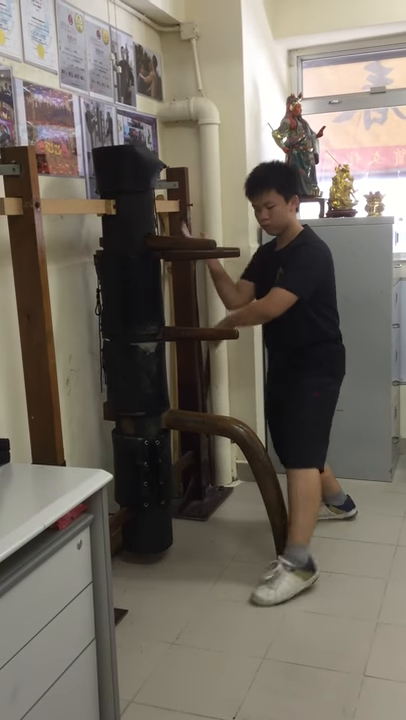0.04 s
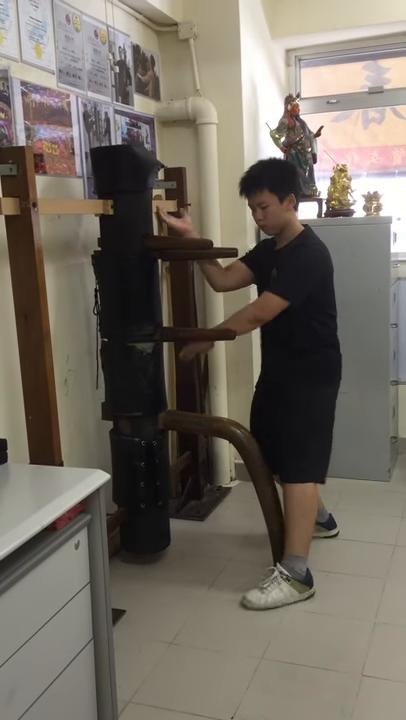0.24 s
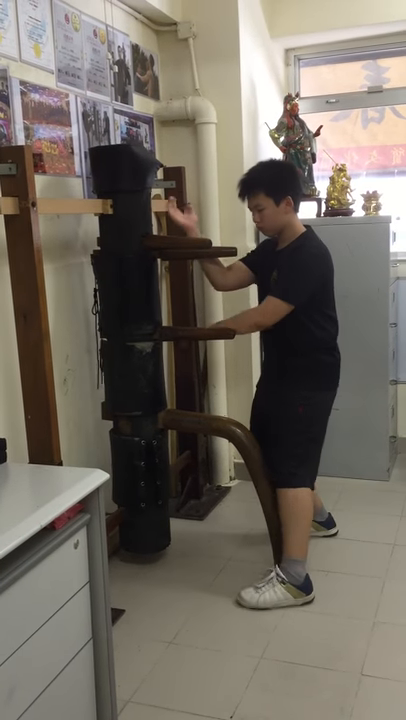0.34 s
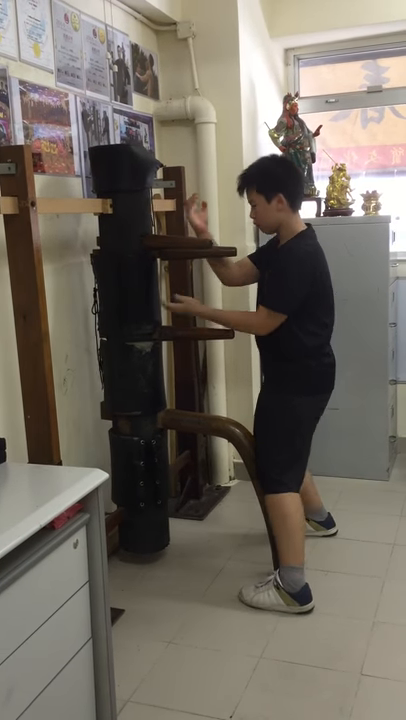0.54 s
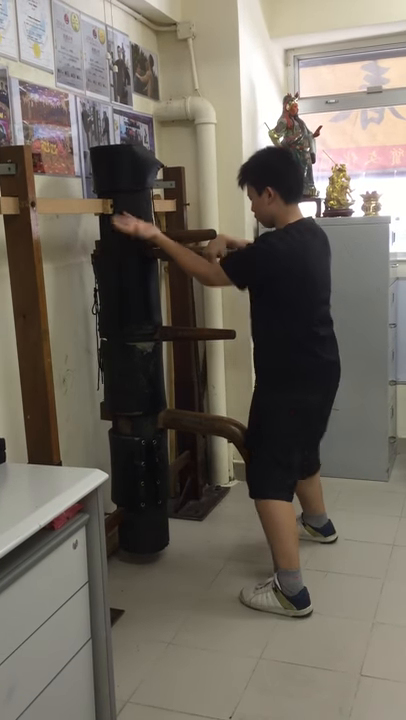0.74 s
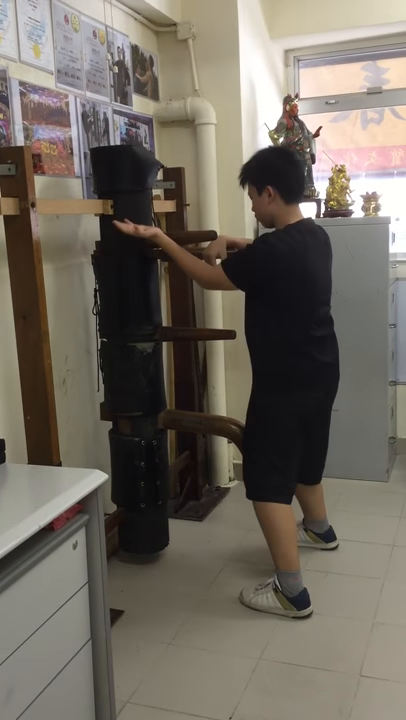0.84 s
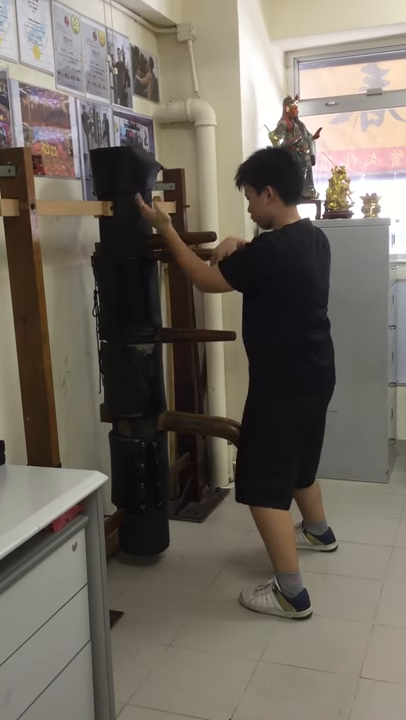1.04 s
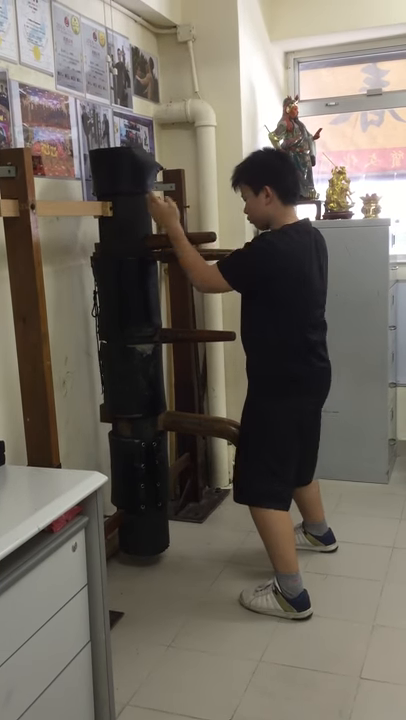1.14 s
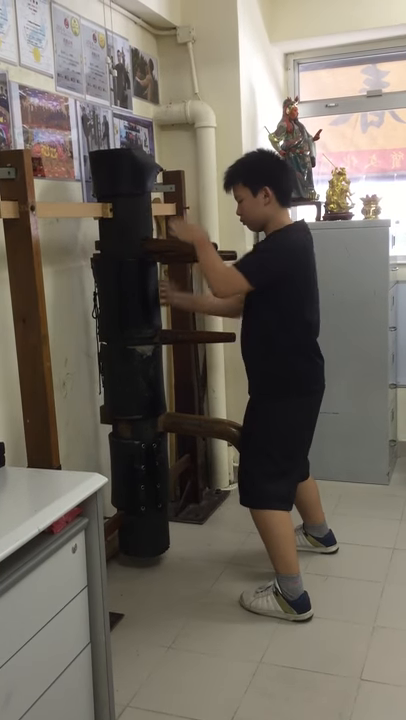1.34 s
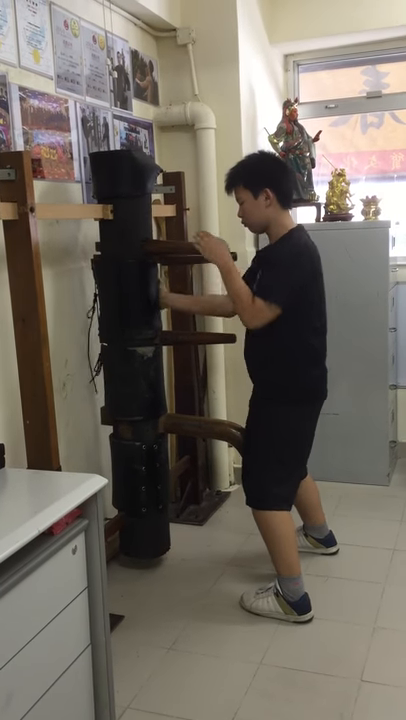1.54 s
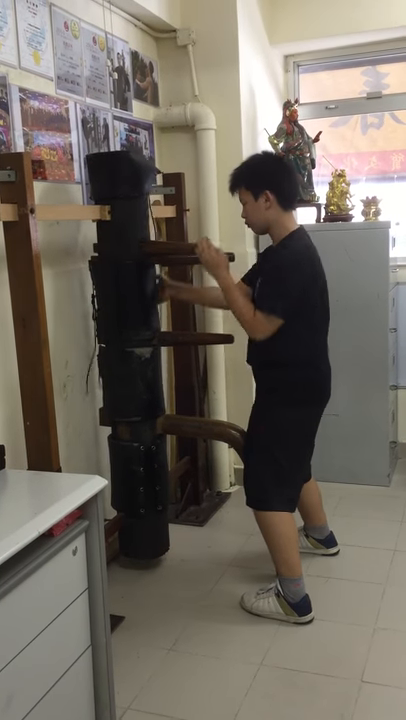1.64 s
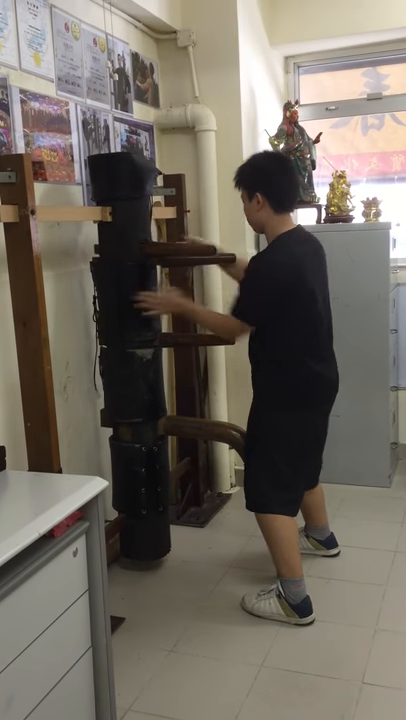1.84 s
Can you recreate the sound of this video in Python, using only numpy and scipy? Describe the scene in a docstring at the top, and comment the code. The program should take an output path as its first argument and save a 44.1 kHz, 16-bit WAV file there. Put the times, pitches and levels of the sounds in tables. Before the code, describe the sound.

Forearms knock on a wooden training dummy, clacking and thudding in an echoing room.

```python
"""A small, hard, tiled room, with one microphone facing a wooden training dummy from far enough off
that the room outweighs the direct sound. Forearms hit each of two loose wooden arms, which clack and
rattle in their sockets; then two palms land on the trunk. The heavy trunk thuds and booms on its rails,
and the room rings for about a second after every blow. Clothes rustle over a quiet room tone."""
import sys
import numpy as np
from scipy import signal
from scipy.fft import rfft, irfft, next_fast_len
from scipy.io import wavfile
from scipy.ndimage import uniform_filter1d

SR = 44100
rng = np.random.default_rng(int(sys.argv[2]) if len(sys.argv) > 2 else 0)


def bounce(signal):
    """Save signal as a 16-bit WAV file at the path given by the first command-line argument."""
    frames = np.transpose(np.atleast_2d(signal))
    limited = np.clip(frames, -1, 1)
    pcm = np.round(limited * 32767).astype(np.int16)
    wavfile.write(sys.argv[1], SR, pcm)


N = 83790
TIME = np.arange(N) / SR

# contacts of each wooden arm: t/s, level/dB, brightness f/Hz, clack relative to the contact/dB
FIRST_ARM_KNOCKS = [(.2225, 21, 3630, 5), (.2445, 27.5, 6870, 3.5), (.2545, 15.5, 3230, -8),
                    (.274, 9, 2470, 9)]
SECOND_ARM_KNOCKS = [(.8348, 17, 1970, 8.5), (.8425, 24, 9000, 0), (.877, -0.5, 14500, 8),
                     (.8915, 8.5, 1900, 19.5)]


def from_db(db):
    """Decibels to gain."""
    return 10 ** (np.asarray(db) / 20)


def at_hz(points, hz):
    """Read a table on a log-frequency axis."""
    freqs, values = np.transpose(points)
    return np.interp(np.log(np.maximum(hz, 1)), np.log(freqs), values)


def unit(x):
    """Scale to an energy of one."""
    return x / np.sqrt(np.sum(x ** 2) + 1e-20)


def dying(t60):
    """Envelope that falls by 60 dB in t60 seconds."""
    return np.exp(-np.log(1000) * TIME / t60)


def rising(rise_s):
    """Envelope that climbs towards one with time constant rise_s."""
    return 1 - np.exp(-TIME / rise_s)


def delayed(x, s):
    """Start x at time s."""
    return np.concatenate([np.zeros(max(int(s * SR), 0)), x])[:N]


def coloured(x, spectrum):
    """Causal (minimum-phase) filter with the given spectrum."""
    size = 2 * next_fast_len(N)
    gain = from_db(at_hz(spectrum, np.fft.rfftfreq(size, 1 / SR)))
    cepstrum = irfft(np.log(gain))
    cepstrum[1:size // 2] *= 2
    cepstrum[size // 2 + 1:] = 0
    return irfft(rfft(x, size) * np.exp(rfft(cepstrum)))[:N]


def evened(x, width_hz):
    """Level the spectrum of a burst, keeping only ripple finer than width_hz."""
    spectrum = rfft(x)
    power = uniform_filter1d(np.abs(spectrum) ** 2, max(int(width_hz * N / SR), 1))
    flat = irfft(spectrum / np.sqrt(np.abs(power) + 1e-12), N)
    return unit(flat * (TIME < TIME[-1] / 2))


def contact(s, db, bright_hz, smear_s=0):
    """A click, or a short swelling burst where surfaces rattle or flesh spreads; softer is duller."""
    push = signal.unit_impulse(N)
    if smear_s:
        swell = TIME * np.exp(-2 * TIME / smear_s)
        push = evened(rng.standard_normal(N) * swell, width_hz=8.6) * np.sqrt(swell)
    soft = signal.butter(2, min(bright_hz, .45 * SR), fs=SR, output="sos")
    return from_db(db) * signal.sosfilt(soft, delayed(unit(push), s) + 1e-18)


def resonance(x, hz, width_hz):
    """One mode, gain 1 at its top."""
    r = np.exp(-np.pi * width_hz / SR)
    feedback = [1, -2 * r * np.cos(2 * np.pi * hz / SR), r * r]
    return signal.lfilter(np.array([1, 0, -1]) * (1 - r * r) / 2, feedback, x + 1e-18)


def low_swing(s, db, hz, t60, rise_s):
    """One deep mode that swells and dies after a push."""
    swing = -np.sin(2 * np.pi * hz * TIME) * dying(t60) * rising(rise_s)
    return from_db(db) * delayed(swing, s)


def room_tone():
    """The steady, low hush of the room."""
    spectrum = [(25, -8), (55, -16), (98, 7.5), (135, -2.5), (280, -5.5), (450, -14), (1100, -13),
                (2200, -20), (4000, -34), (9000, -41.5), (16000, -53)]  # colour of the hush: f/Hz, level/dB
    return from_db(-22) * coloured(rng.standard_normal(N), spectrum)


def clothes():
    """The treble hiss of cloth, swelling as the body moves."""
    rustle = [(0, -56.5), (.13, -48.5), (.2, -48.5), (.4, -41), (.7, -76), (.82, -48.5), (1.1, -72),
              (1.4, -79), (1.7, -57), (1.9, -61)]  # course of the hiss: t/s, level/dB
    spectrum = [(500, -39), (2500, 3.5), (5000, 0), (9300, -1), (10500, -13.5), (13000, -8), (17000, -41)]  # colour of the cloth: f/Hz, level/dB
    motion = from_db(np.interp(TIME, *np.transpose(rustle)))
    return motion * coloured(rng.standard_normal(N), spectrum)


def tiled_room(x):
    """At the microphone: weak direct sound, near-wall reflections and a tail whose treble dies first."""
    decay = [(60, 1.7), (150, 1.64), (300, 1.035), (700, 0.9), (1600, 0.99), (3000, 0.96), (6000, 0.72),
             (10000, 0.59), (16000, 0.27)]  # reverberation time: f/Hz, T60/s
    direct_db, early_db, walls_db = -10, 6.5, 0.26
    hz, centres = np.fft.rfftfreq(N, 1 / SR), np.geomspace(50, 16000, 14)
    white = rfft(rng.standard_normal(N))
    bands = [irfft(white * at_hz(np.c_[centres, share], hz), N) for share in np.eye(len(centres))]
    tail = sum(band * dying(at_hz(decay, centre)) for band, centre in zip(bands, centres))
    tail = unit(tail * rising(0.0043))
    echoes = rng.standard_normal(N) * (rng.random(N) < 3000 / SR)  # about 3000 a second
    early = from_db(early_db) * unit(echoes * dying(0.3))
    diffuse = evened(early + tail, width_hz=25.6)  # the walls favour no wider band
    walls = from_db(walls_db) * delayed(diffuse, 0.001895)
    return from_db(direct_db) * x + signal.fftconvolve(x, walls)[:N]


def lingering_tones():
    """The purest tones of each arm build up in the room after its hardest contact and die with it."""
    # tones that the room keeps ringing: f/Hz, level/dB
    first_tones = [(1735, -32), (1772, -22.5)]
    second_tones = [(1007, -21), (1372, -56), (1533, -16), (1587, -22)]
    ringing = np.zeros(N)
    for knocks, tones in (FIRST_ARM_KNOCKS, first_tones), (SECOND_ARM_KNOCKS, second_tones):
        hardest_s = max(knocks, key=lambda knock: knock[1])[0]
        sines = sum(from_db(db) * np.sin(2 * np.pi * (hz * TIME + rng.random())) for hz, db in tones)
        ringing += delayed(sines * dying(0.76) * rising(0.017), hardest_s)
    return ringing


def frame_boom():
    """The frame swings in one deep, slowly dying mode."""
    pushes = [(0.291, -60), (1.598, -33)]  # pushes on the frame: t/s, level/dB
    return sum(low_swing(s, db, hz=55.3, t60=6.8, rise_s=0.043) for s, db in pushes)


def bumps():
    """Soft, deep bumps that die at once."""
    pulses = [(0.296, -19, 76.5, 0.1), (1.4875, -18.5, 63, 0.091), (1.880, -2, 81, 0.015)]  # bass pulses: t/s, level/dB, f/Hz, T60/s
    return sum(low_swing(s, db, hz, t60, rise_s=0.00062) for s, db, hz, t60 in pulses)


def trunk():
    """Dull thuds of the trunk on its rails."""
    landings = [(0.263, 17.5, 497), (0.29, 32, 240), (0.887, 21, 497)]  # trunk meets rails: t/s, level/dB, brightness f/Hz
    spectrum = [(25, -46), (50, 6.5), (80, -12), (125, 1.5), (200, -1.5), (300, 1), (600, -10.5),
                (2000, 18)]  # response of the trunk: f/Hz, level/dB
    return coloured(sum(contact(s, db, hz) for s, db, hz in landings), spectrum)


def rattles():
    """A loose arm chatters in its socket, wood on wood, fine and bright."""
    bursts = [(0.246, 3, 0.065), (0.835, 11.5, 0.037), (1.504, 4, 0.0087)]  # bursts of chatter: t/s, level/dB, smear/s
    spectrum = [(500, -23), (2500, -43), (4000, -22.5), (7000, -3), (10000, -9), (17000, -16.5)]  # colour of the chatter: f/Hz, level/dB
    chatter = sum(contact(s, db, bright_hz=15700, smear_s=smear) for s, db, smear in bursts)
    return coloured(chatter, spectrum)


def hands():
    """Palms slap the trunk and skin brushes along the wood."""
    palms = [(1.4735, 14.5, 15400), (1.513, 12.5, 1490), (1.5234, 19, 4330), (1.536, 14.5, 11300),
             (1.583, 13.5, 2980), (1.631, 12.5, 1290), (1.662, 2.5, 14900)]  # palm contacts: t/s, level/dB, brightness f/Hz
    palm_spectrum = [(60, 5), (150, 3), (330, 9), (450, 3), (680, 8.5), (900, 5), (1100, 7), (1500, 4.5),
                     (2200, -0.5), (3500, -7), (5500, -13.5), (10000, -19), (17000, -25)]  # colour of a slap: f/Hz, level/dB
    strokes = [(1.43, 10.5)]  # sliding skin: t/s, level/dB
    brush_spectrum = [(300, -1.5), (1500, -10), (2600, -5), (4500, -10), (6500, -21), (8000, -35),
                      (16000, -46)]  # colour of a stroke: f/Hz, level/dB
    slaps = sum(contact(s, db, hz, smear_s=0.005) for s, db, hz in palms)
    brushes = sum(contact(s, db, bright_hz=11900, smear_s=0.0051) for s, db in strokes)
    return coloured(slaps, palm_spectrum) + coloured(brushes, brush_spectrum)


def tocks():
    """Wood damped by the limb that strikes it: one short resonance a blow."""
    blows = [(0.2227, 38.5, 1008, 85.5), (0.2321, 38.5, 1000, 115), (.245, 36.5, 560, 85),
             (.835, 31.5, 707, 85), (.845, 31, 1000, 80), (1.5221, 27, 1010, 152), (1.526, 25.5, 714, 89.5)]  # limb meets wood: t/s, level/dB, f/Hz, width/Hz
    wood = np.zeros(N)
    for s, db, hz, width in blows:
        ring = resonance(contact(s, db, bright_hz=4270), hz, width)
        wood += resonance(ring, hz, 5 * width)  # trims the skirts of the resonance
    return wood


def wooden_arms():
    """Every contact rings an arm's modes and adds a dry, rattling clack."""
    # modes of each arm: f/Hz, width/Hz, level/dB
    first_modes = [(559.6, 18, 15), (677, 28, 12), (893, 93, 8.5), (1061, 55, 10.5), (1480, 49, 7.5),
                   (1700, 70, 13.5), (1753, 39, 20.5), (1816, 59, 10.5), (2244, 160, 5.5), (2449, 73, 8.5)]
    second_modes = [(563, 32, 10), (662.6, 40, 15.5), (870, 63, 12), (1011, 107, 15.5), (1093, 55, 13.5),
                    (1424, 50, 12.5), (1556, 22, 18.5), (1580, 44, 16), (1798, 58, 16), (2464, 110, 12.5),
                    (2650, 104, 5), (4182, 140, 1), (6480, 140, -4.5), (9230, 170, -8)]
    clack_spectrum = [(60, -31.5), (150, -10.5), (300, 2), (450, -8.5), (800, -4), (1800, 3), (2700, -5.5),
                      (3300, -8), (5000, -12.5), (8500, -16.5), (11000, -21.5), (17000, -15)]  # dense modes of hard wood: f/Hz, level/dB
    wood = np.zeros(N)
    for knocks, modes in (FIRST_ARM_KNOCKS, first_modes), (SECOND_ARM_KNOCKS, second_modes):
        force = sum(contact(s, db, hz) for s, db, hz, _ in knocks)
        clacks = sum(contact(s, db + clack_db, hz, smear_s=0.0036) for s, db, hz, clack_db in knocks)
        wood += coloured(clacks, clack_spectrum)
        for k, (hz, width, db) in enumerate(modes):
            wood += (-1) ** k * from_db(db) * resonance(force, hz, width)
    return wood


def scene():
    """The dummy as heard from the microphone, over rustling clothes and room tone."""
    tock = tocks()
    dummy = tock + trunk() + wooden_arms() + rattles() + hands()
    background = room_tone() + clothes()
    on_axis = from_db(-3) * tock  # the struck face points at the microphone: extra direct sound
    wood = tiled_room(dummy) + on_axis + lingering_tones()
    return (background + frame_boom() + bumps() + wood)[None]


def record(dry):
    """The mono microphone rounds the loudest peaks and loses the deepest bass and the very top."""
    ceiling, low_hz, top_hz = 1.15, 40, 17300
    rounded = ceiling * np.tanh(dry / ceiling)
    thin = signal.sosfilt(signal.butter(4, low_hz, "high", fs=SR, output="sos"), rounded)
    return signal.sosfilt(signal.ellip(10, .1, 70, top_hz, fs=SR, output="sos"), thin)


dry = scene()
out = record(dry)
bounce(out)
```